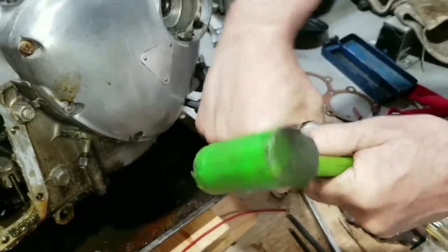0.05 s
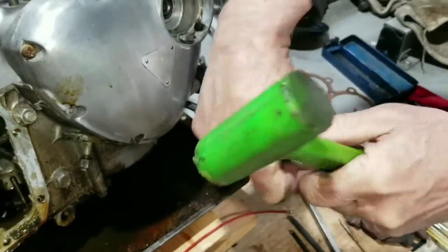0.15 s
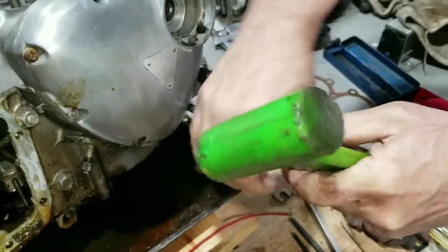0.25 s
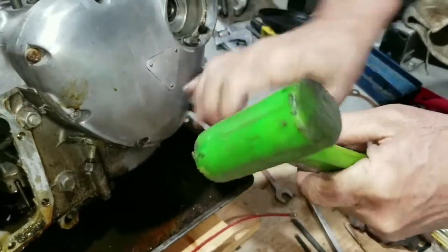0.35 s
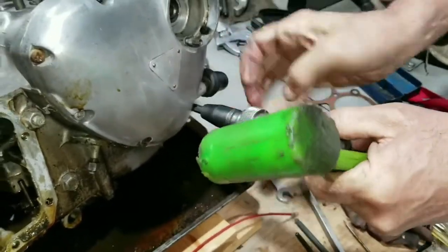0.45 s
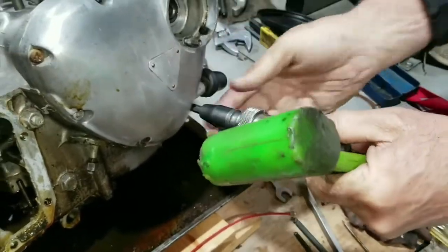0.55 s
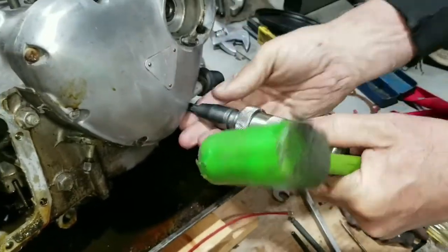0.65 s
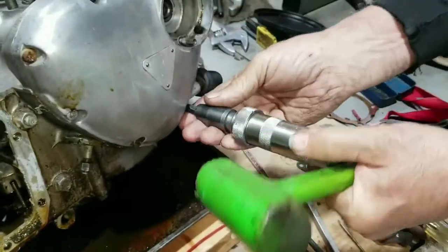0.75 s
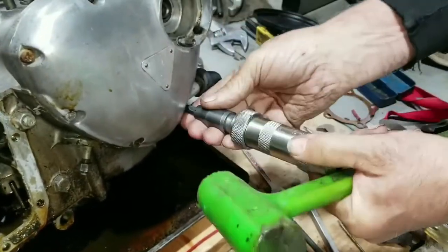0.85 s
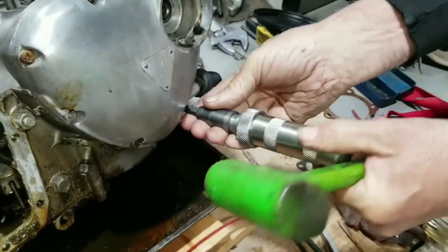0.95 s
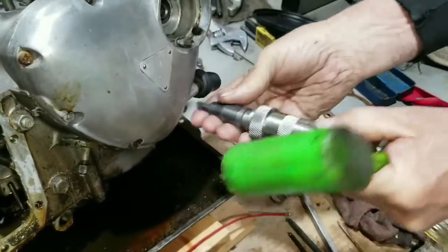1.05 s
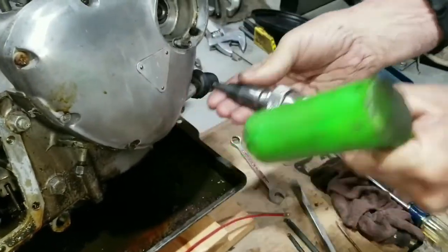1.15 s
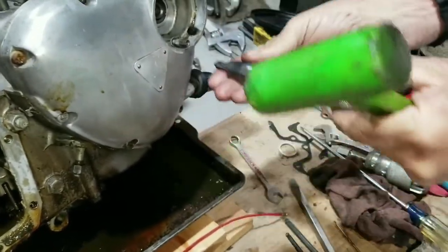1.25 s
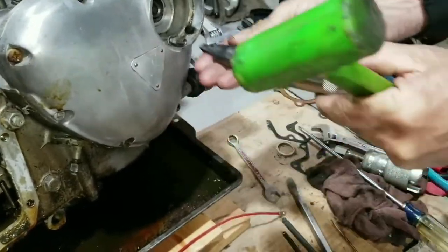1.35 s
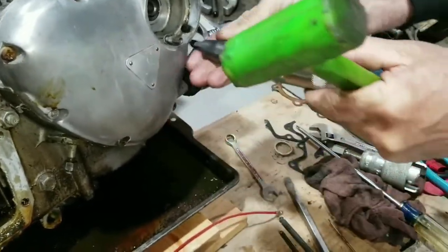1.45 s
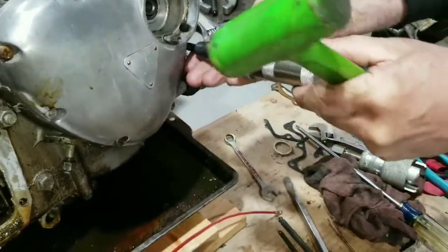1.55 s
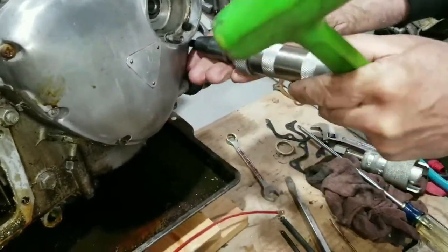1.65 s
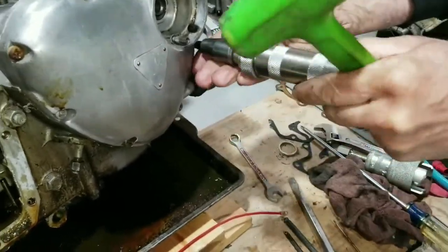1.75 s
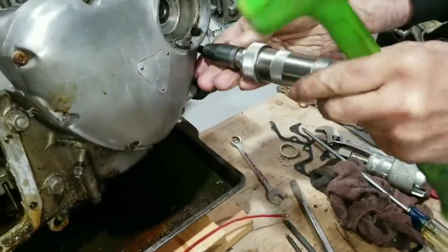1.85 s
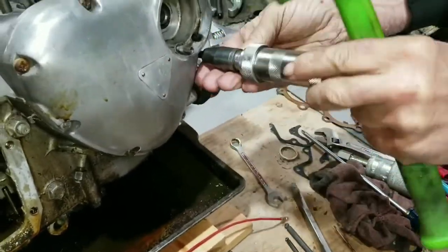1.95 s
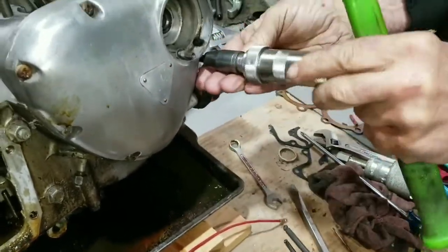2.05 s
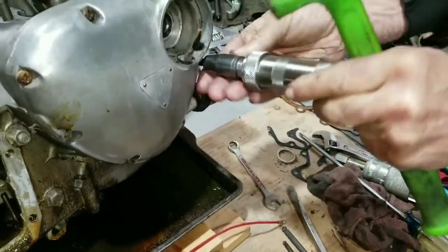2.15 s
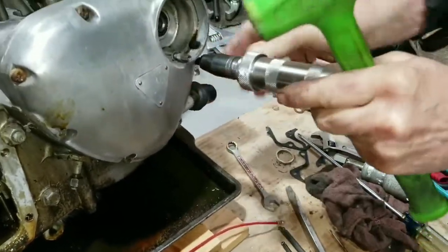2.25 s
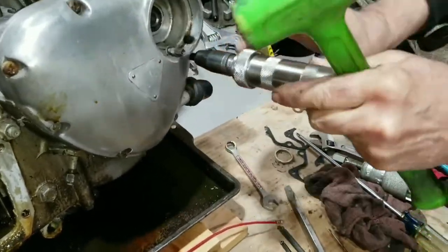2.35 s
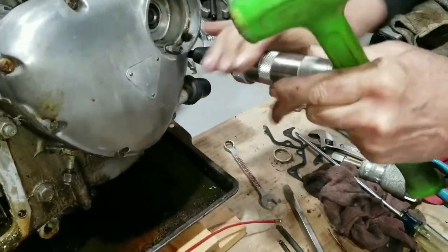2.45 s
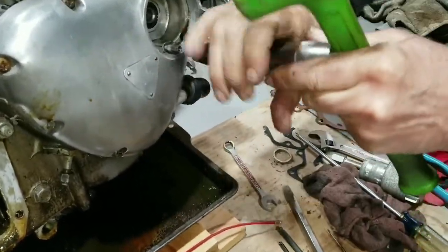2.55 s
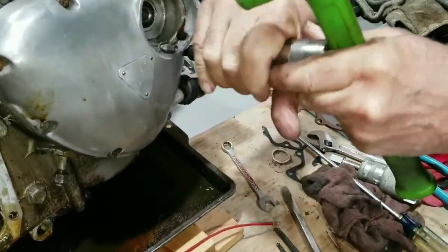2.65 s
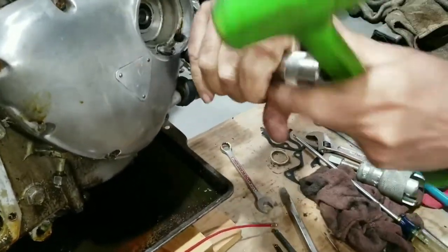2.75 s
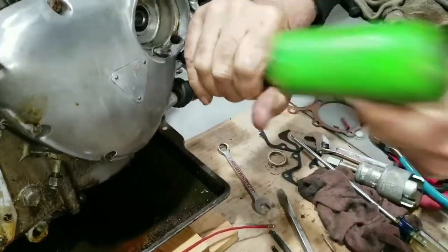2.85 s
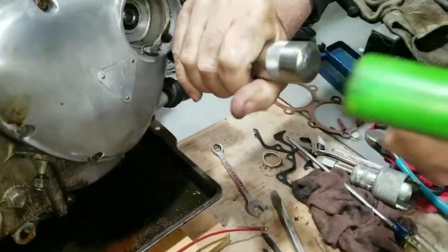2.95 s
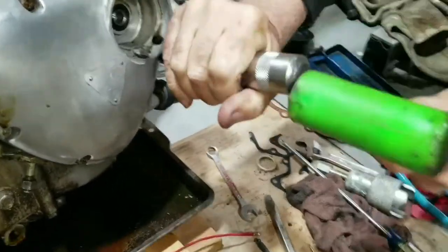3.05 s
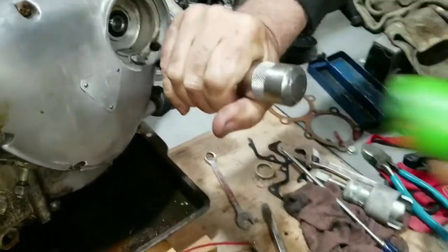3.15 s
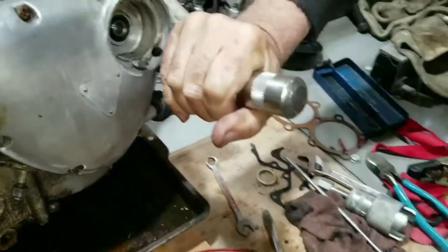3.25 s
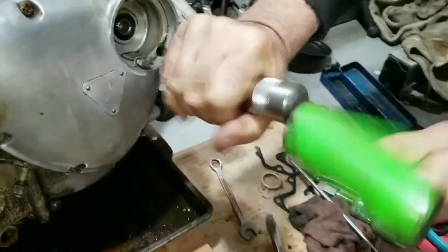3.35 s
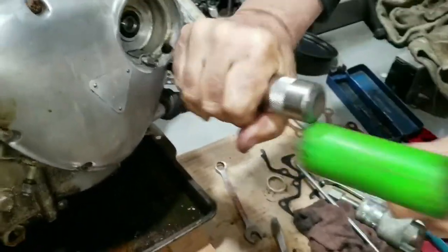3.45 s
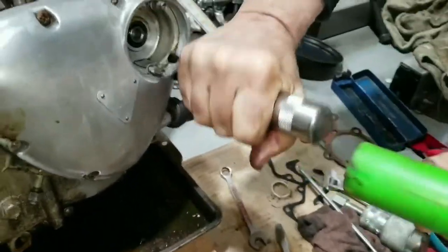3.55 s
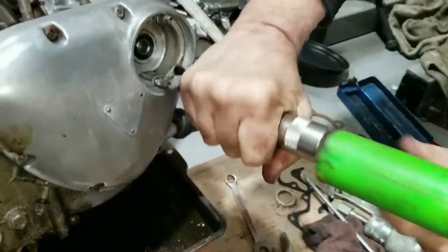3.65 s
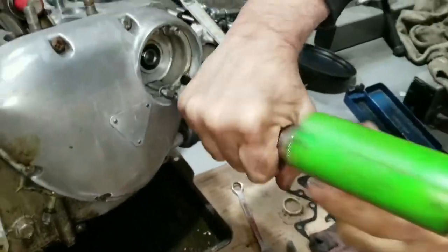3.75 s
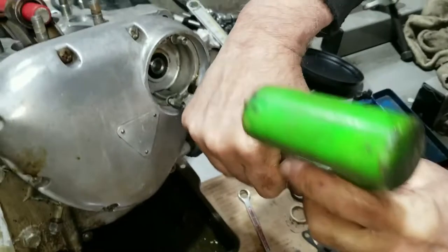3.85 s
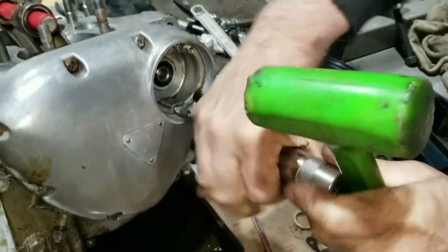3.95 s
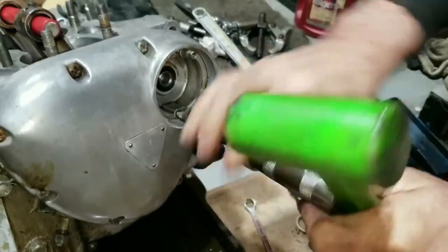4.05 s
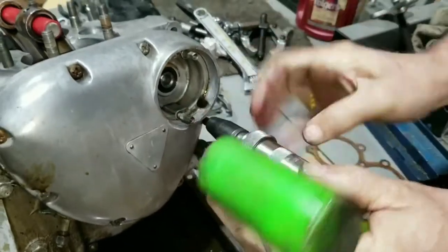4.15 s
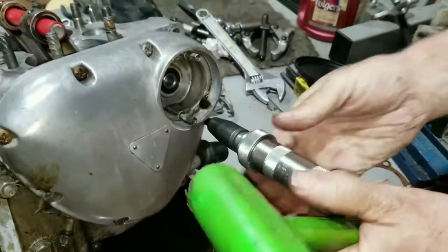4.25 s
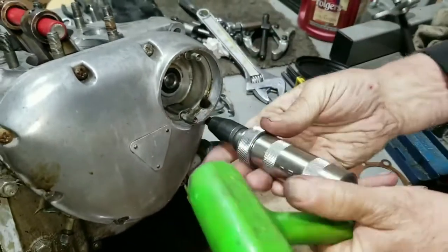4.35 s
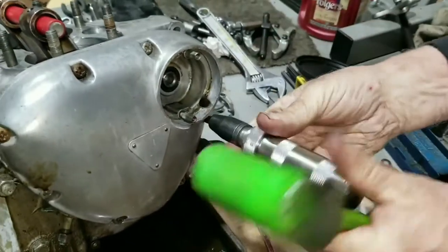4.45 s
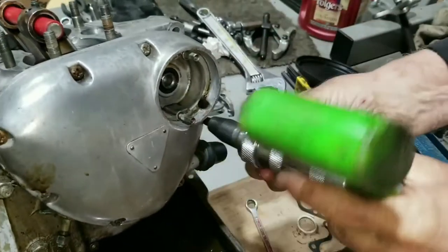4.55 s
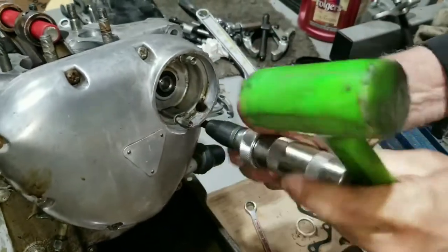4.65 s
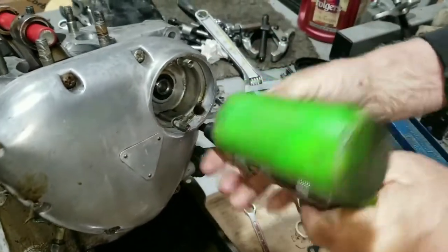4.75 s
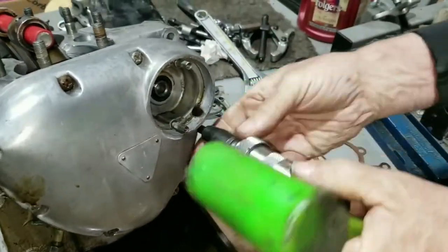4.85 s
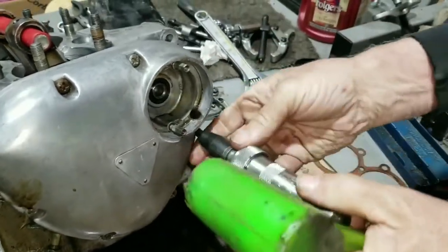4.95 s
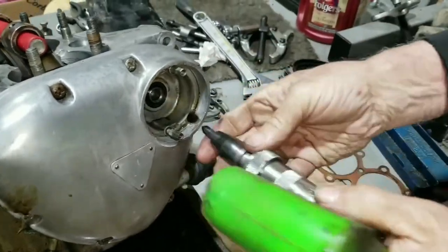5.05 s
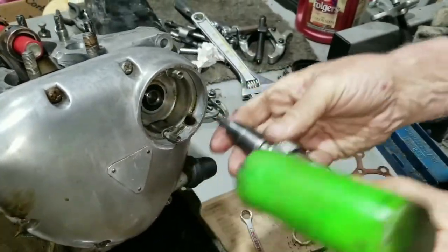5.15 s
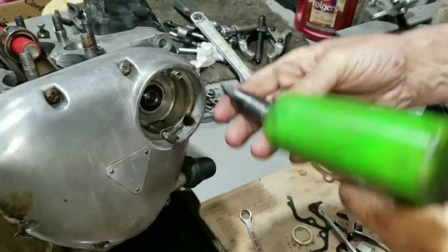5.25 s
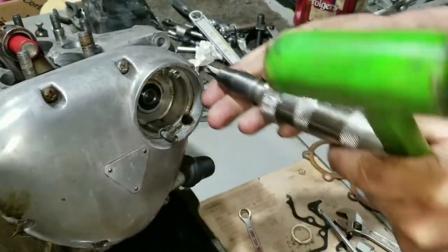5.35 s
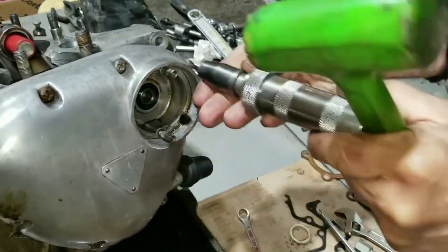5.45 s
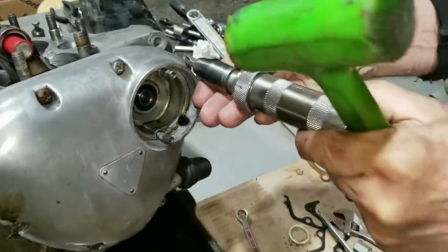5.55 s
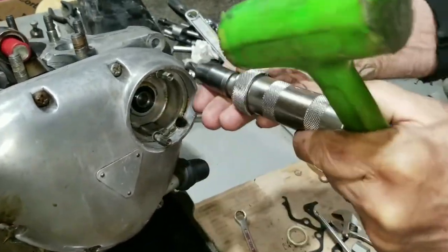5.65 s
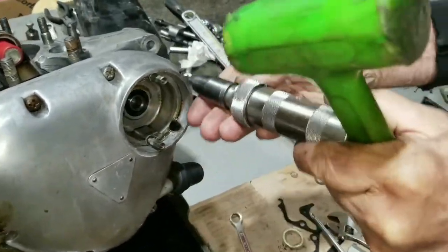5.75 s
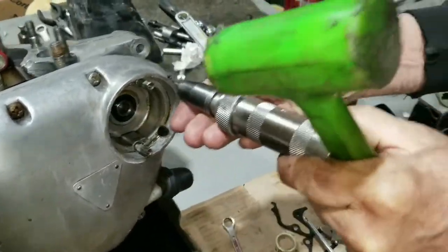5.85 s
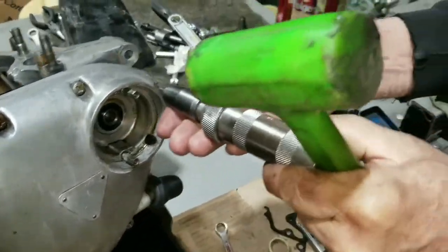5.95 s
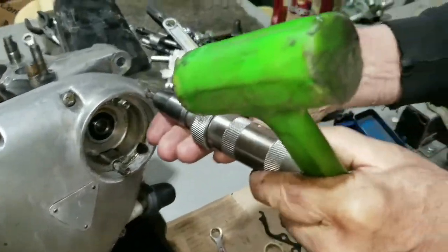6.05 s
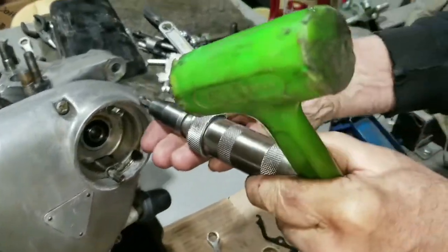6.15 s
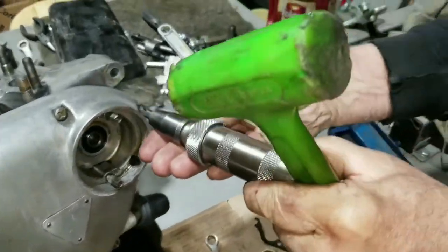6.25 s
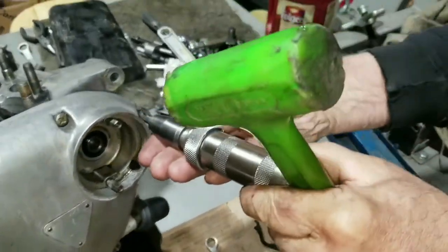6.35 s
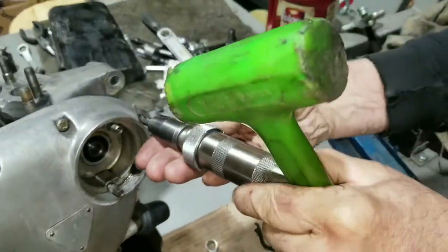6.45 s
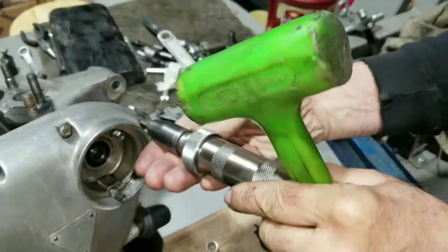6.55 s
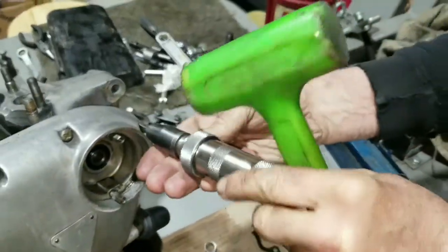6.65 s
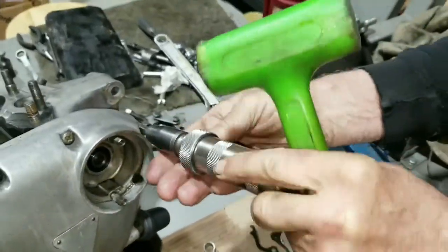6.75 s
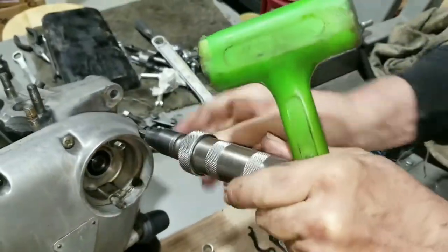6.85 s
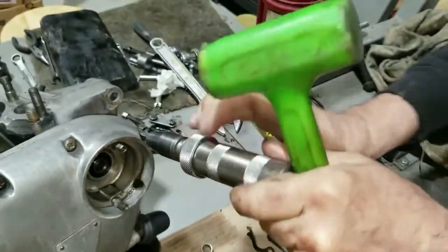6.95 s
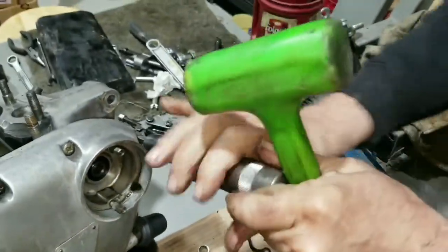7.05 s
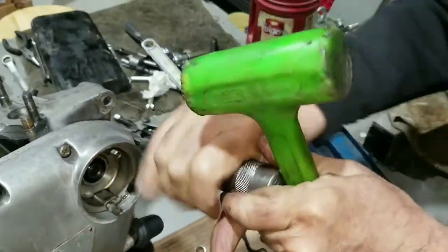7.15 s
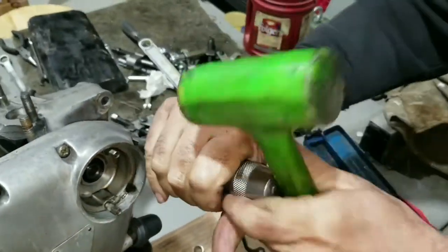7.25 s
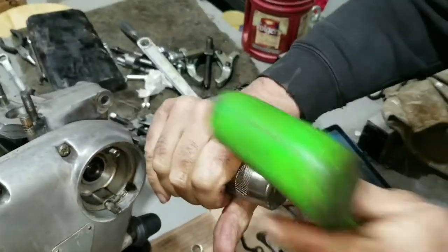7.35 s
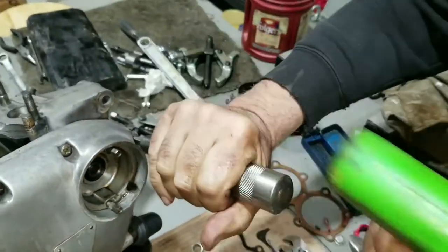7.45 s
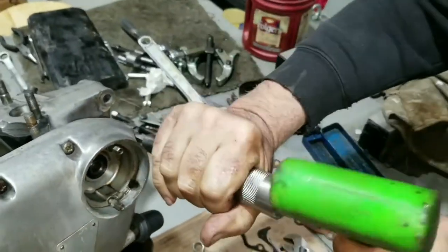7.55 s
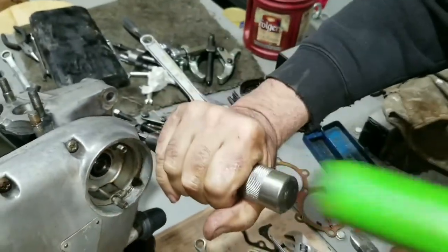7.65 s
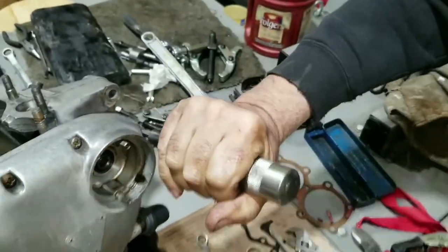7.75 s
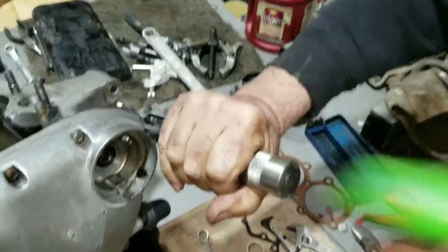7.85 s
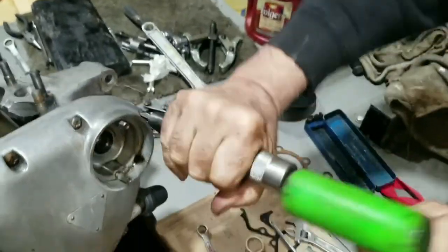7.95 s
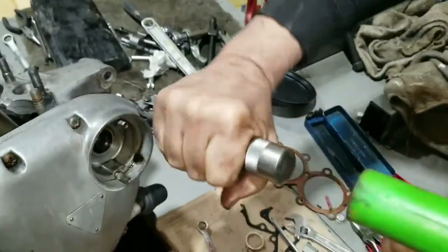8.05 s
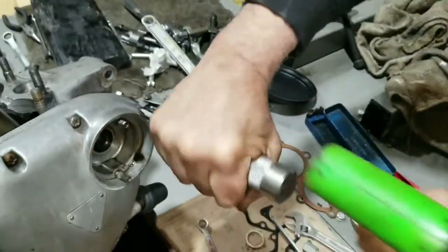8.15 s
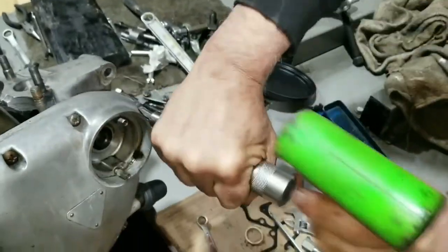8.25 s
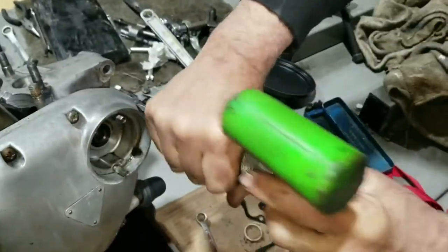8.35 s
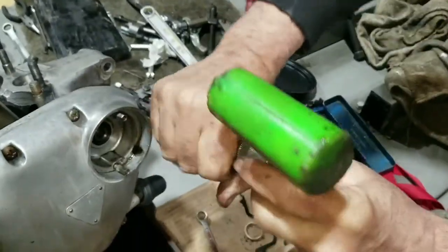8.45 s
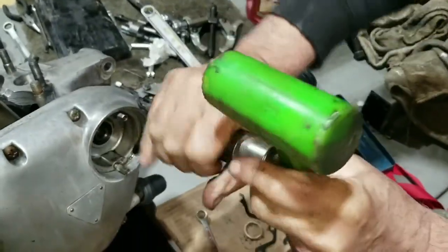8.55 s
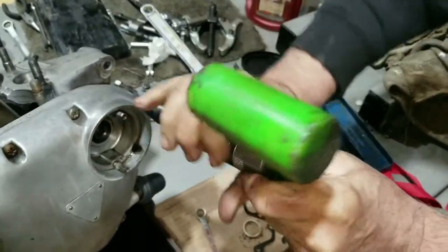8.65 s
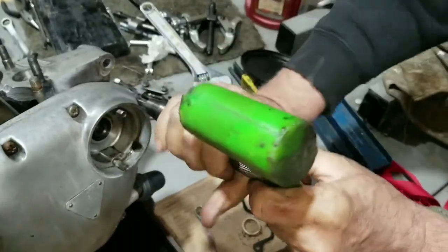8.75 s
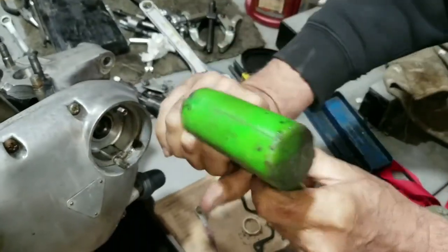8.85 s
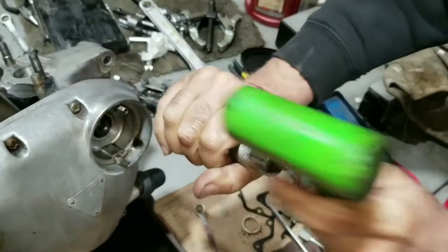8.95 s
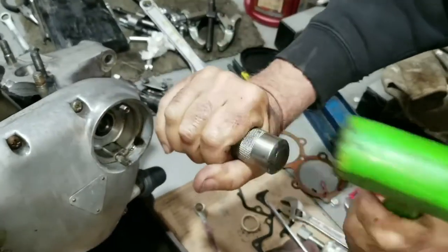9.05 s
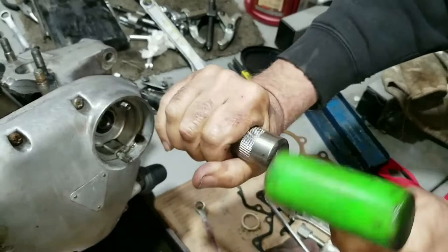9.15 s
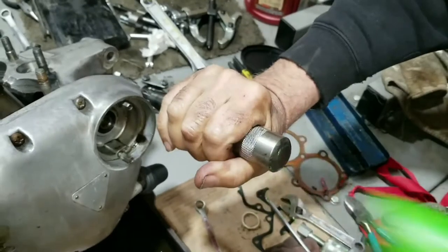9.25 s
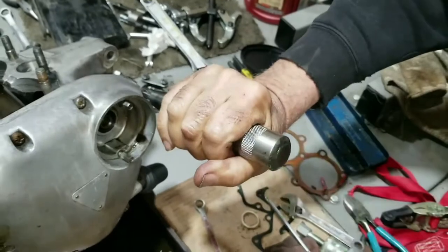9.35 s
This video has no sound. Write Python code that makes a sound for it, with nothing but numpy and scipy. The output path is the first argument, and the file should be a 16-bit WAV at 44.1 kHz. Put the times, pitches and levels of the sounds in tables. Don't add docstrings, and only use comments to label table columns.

```python
import sys
import numpy as np
from scipy import signal
from scipy.fft import rfft, irfft
from scipy.io import wavfile
from scipy.ndimage import uniform_filter1d, minimum_filter1d

SR = 44100
rng = np.random.default_rng(int(sys.argv[2]) if len(sys.argv) > 2 else 0)


def voltage_ratio(level):
    return 10 ** (np.asarray(level, float) / 20)


def store_pcm(level_fs):
    pcm = np.round(np.clip(level_fs, -1, 1) * 32767).astype(np.int16)
    wavfile.write(sys.argv[1], SR, np.atleast_2d(pcm).T)


N = 414981

# t/s, crack level/dB, shot rattle level/dB, ring level/dB, thump level/dB
HARD_BLOWS = [
    (3.3486, -8, -17.5, -23.5, -32),
    (7.8776, -5, -15, -15.5, -36),
]
LIGHT_TAPS = [
    (2.9953, -13.5, -31.5, -37, -42),
    (7.5379, -9, -23, -32, -33),
    (9.1239, -16.5, -28.5, -35.5, -44.5),
]
# f/Hz, level/dB per Hz
RATTLE_SPECTRA = [
    [(180, -50), (300, -5.5), (461, -20), (610, -3), (794, -13), (907, 1), (1020, -7), (12900, -30.5),
     (15500, -44)],
    [(180, -41.5), (400, -22), (1070, -6), (1440, -4.5), (1970, -14), (2790, -11), (11500, -17),
     (14000, -19.5), (15500, -50)],
    [(180, -20.5), (300, -2.5), (756, -15.5), (1300, -3), (2100, -21), (4000, -21), (7370, -21.5),
     (14000, -16), (15500, -31)],
    [(180, -56.5), (300, -20), (517, -11.5), (769, -19), (1420, -9.5), (1750, -21.5), (3230, -15.5),
     (14000, -31.5), (15500, -54)],
    [(180, -17.5), (300, -7), (517, -5.5), (968, -5.5), (1540, -1), (1940, -9.5), (3230, -10), (14000, -12),
     (15500, -32.5)],
]
# f/Hz, level/dB, t60/s
BLOW_MODES = [
    [(87, 0, .2), (635, -1, 0.25), (703, -6.5, 0.28), (880, -8, 0.24)],
    [(223, 0.5, 0.15), (340, -16, .2), (512.4, -14, .2), (1130, -5, .18), (1283, -5.5, .2), (1424, -1, .18),
     (2137, -13, .3), (2710, -13, .4), (3140, -5.5, 0.34), (3330, -6.5, .2), (3750, -10.5, 0.33),
     (4140, -9, 0.27), (4380, -5, .2), (4759, -8, .2)],
    [(78, -5, 0.33), (134, -3, 0.4), (219, -1.5, 0.24), (556, -4.5, .2), (1112, -6, 0.2), (1550, -2, 0.17),
     (1290, -2, .2), (1650, -3, .2)],
    [(222, -2, 0.37), (520, -3, 0.63), (610, -14.5, 0.15), (1160, -5, 0.28), (1260, -6, 0.14),
     (1408, -5, 0.22), (1662, -10, 0.48), (1949, -13, 0.15), (2760, -10, 0.56), (3100, -13, .25),
     (3332, -11, 0.3), (3500, -11.5, 0.25), (3910, -13.5, 0.25), (887, -12, 0.32)],
    [(138, -22, 0.6), (547, -1.5, 0.15), (884, 6, 0.12), (1450, -16, 0.25), (1526, -5, 0.23)],
]
# f/Hz, level/dB, t60/s
CASE_MODES = [(146.7, -7, 0.45), (230, -2, 0.19), (297, -13, 0.19), (338, -4.5, 0.024), (527, -2.5, 0.6),
              (650, -0.5, 0.15), (880, -3.5, 0.3), (1140, -7, 0.051), (1170, -4, 0.24), (1223, 3, 0.16),
              (1512, 4, 0.084), (1770, -2, 0.11)]
# t/s, peak level/dB, centre f/Hz, bright edge level/dB
CAM_REBOUNDS = [(3.0008, -15, 3885, -4.5), (3.3968, -14, 4300, -17), (7.5506, -23.5, 4120, -22),
                (7.901, -12.5, 1370, -17), (7.9249, -2.5, 3060, -4.5), (8.1615, -33, 4000, -19.5),
                (9.1265, -23.5, 5400, -15.5), (9.1385, -31, 3320, -15), (3.3515, -13.5, 5880, -11.5),
                (3.3625, -14.5, 1376, -8.5), (3.3705, -12.5, 2900, -7), (3.417, -23, 3213, -17),
                (7.8955, -17, 5690, -14), (7.9355, -13, 3140, -16.5), (7.543, -19.5, 1550, -20)]
# t/s, peak level/dB, f/Hz, rise/s, t60/s
MODE_BUMPS = [(7.551, -23.5, 236, 0.0035, 0.094), (7.569, -25.5, 162, 0.0031, .12),
              (7.621, -32, 137.5, 0.018, 0.28), (9.135, -40, 191, 0.0074, 0.17),
              (9.2, -38.5, 149.3, 0.016, 0.28), (2.998, -31.5, 197, 0.0034, 0.1),
              (7.884, -13, 528, .01, .14), (9.124, -32, 310, .003, .1), (3.36, -22, 270, .008, .15),
              (1.542, -43, 525, .008, .1), (1.75, -44, 520, .006, .1), (3.008, -36, 620, .006, .1)]
# peak t/s, rise/s, fall/s, peak level/dB, fizz level/dB re
SLIDES_AND_RUSTLES = [(2.705, 0.038, 0.059, -49, -23), (2.75, 0.034, .05, -56, -14), (2.9, 0.11, 0.11, -32.5, -6),
                      (3.31, 0.13, 0.056, -58, -3), (5.88, 0.041, .17, -52.5, -15), (7.299, 0.07, 0.24, -68.5, 1),
                      (7.832, 0.094, 0.036, -60.5, 2), (8.24, 0.052, 0.28, -65.5, -6), (8.6, .03, 0.13, -71, -7.5),
                      (9.405, 0.11, .04, -58, -11), (9.109, 0.096, .015, -76, -4), (1.92, 0.044, 0.051, -68, 4.5)]
# f/Hz, level/dB per Hz
SLIDE_SPECTRUM = [(180, -35), (330, -4), (624, -20), (800, -9), (1360, -4), (2300, -6), (4300, 0),
                  (8000, -6.5), (11500, -36.5), (18700, -120)]
# f/Hz, level/dB per Hz
FIZZ_SPECTRUM = [(6000, -31), (8500, -9), (11000, 2.5), (14000, -4), (16000, -12.5)]
# t/s, peak level/dB, centre f/Hz, bright edge level/dB
SCREW_TICKS = [(0.2884, -55, 4350, -11), (0.3805, -58, 4540, -18), (0.9624, -21, 4710, 0),
               (0.9659, -33.5, 2970, -12.5), (1.4118, -30, 3890, -3.5), (1.5405, -40, 3880, 1),
               (1.6003, -48.5, 4840, -11), (1.6296, -38.5, 5210, -5), (1.654, -36, 4670, 6.5),
               (1.7466, -46, 5700, -16), (1.7683, -41, 6400, -9.5), (2.0716, -34.5, 4540, -3),
               (2.3491, -33, 4044, -3.5), (2.4459, -37, 3000, -4), (4.0122, -54, 3860, -23),
               (4.512, -63, 6000, -3), (4.654, -48, 4010, -9), (4.9253, -40, 3040, 0.5),
                      (5.0119, -45, 4960, -10), (5.0275, -27, 5200, 0), (5.438, -35.5, 5245, -16),
                      (5.451, -34.5, 3680, -4), (5.5645, -44, 5855, -18), (5.6216, -43.5, 5150, -10),
                      (5.6538, -45, 2910, -6), (5.7616, -34.5, 5663, -24), (5.776, -32, 6060, -11),
                      (5.832, -32, 5690, -15), (5.978, -34, 5070, -16), (6.032, -38, 5420, -29),
                      (6.1777, -41.5, 4830, -26.5), (6.194, -36.5, 2110, -6), (6.4479, -43, 5770, -16),
                      (6.479, -26, 5195, -12), (6.6264, -52, 6560, -20), (6.8227, -22, 5676, -3),
                      (8.5914, -62, 2000, -3), (8.6273, -50.5, 4140, -14)]
# t/s, peak level/dB, upper mode share level/dB, contact/s
CASE_KNOCKS = [(0.281, -47.5, -57, 0.016), (1.538, -38.5, -9.5, 0.02), (1.629, -47, -19, 0.0072),
               (1.748, -37, -14, 0.014), (1.864, -46.5, -38, 0.013), (1.899, -49, -16, 0.012),
               (1.933, -45.5, -16, 0.014), (2.064, -52.5, -19, 0.016), (2.309, -49.5, -7, 0.051),
               (2.342, -39, -0.5, 0.023), (2.866, -40, -31, 0.0031), (4.013, -58, -3.5, 0.0099),
               (4.099, -69, -10, 0.015), (4.654, -54, -12, 0.011), (5.449, -56, 6, 0.037),
               (5.831, -31.5, 2, 0.0051), (6.177, -49.5, 4.5, 0.017), (6.484, -38, 8, 0.012),
               (6.596, -48.5, -4, 0.021), (6.628, -45, -1.5, 0.0079), (6.821, -39, 5.5, 0.012),
               (6.975, -59, -29, 0.019), (8.17, -44, -1.5, 0.0076), (8.626, -53.5, -2, 0.012)]
# t/s, level/dB
GRIP_RUB = [
    (5.55, -65.5),
    (5.8, -69.5),
    (6.1, -69.5),
    (6.25, -66),
    (6.4, -68.5),
    (6.66, -63),
    (6.85, -65),
    (6.96, -63.5),
    (7.2, -85.5),
]
# f/Hz, level/dB per Hz
GRIP_SPECTRUM = [(1470, -60), (3700, -40), (4400, 0.5), (5660, -4), (6410, 0.5), (7800, -1.5),
                 (9260, -11.5), (14500, -10)]
# f/Hz, t60/s
GARAGE_DECAY = [(100, 0.7), (500, 0.65), (1500, 0.68), (4000, 0.46), (8000, 0.41), (14000, 0.16)]
# f/Hz, level/dB
BODY_SHADOW = [(60, 1.0), (130, 1.0), (290, 0.5), (640, 2.0), (1410, -2.5), (3100, 0.5), (6820, 3.5),
               (15000, 1.5)]
# t/s, level/dB
RUMBLE_LEVEL = [(0.0, -57), (0.5, -62), (1.1, -58), (1.5, -57), (2.15, -60.5), (2.85, -56), (3.45, -57),
                (3.719, -74), (4.469, -65.5), (4.799, -55), (5.201, -63), (5.9, -52.5), (6.452, -58.5),
                (6.85, -53.5), (7.299, -62.5), (8.05, -56.5), (8.4, -73.5), (9.1, -78.5)]
# t/s, level/dB, half length/s
BENCH_SHUDDERS = [
    (3.055, -48, 0.037),
    (3.413, -52.5, 0.046),
    (7.76, -59.5, 0.061),
    (8.019, -45.5, 0.027),
    (9.307, -55, 0.087),
]
# f/Hz, level/dB per Hz
RUMBLE_SPECTRUM = [(12, -48.5), (20, -14), (43, -21.5), (107, -3), (133, -2), (341, -11.5), (380, -16.5),
                   (608, -29.5), (715, -34), (857, -30.5), (1030, -36.5), (1500, -34), (1950, -68),
                   (3300, -120)]
# f/Hz, level/dB per Hz
HISS_SPECTRUM = [(350, -21.5), (600, 4.5), (687, -8.5), (777, -3.5), (1580, -3.5), (2070, -3.5), (3110, -6),
                 (4810, -6.5), (13900, -11), (15500, -19)]
# f/Hz, likeness/1
LIKENESS = [(60, 0.87), (180, 0.92), (550, 0.41), (1650, 0.14), (4970, 0.21), (15000, 0.19)]

HARD_DB, HARD_RATTLE_S, LIGHT_RATTLE_S = -20, .049, .016
SETTLE_HZ, SETTLE_DB, SETTLE_S = 5000, -23, 0.09
BENCH_RING, HELD_RING = .7, 0.55
PARTNER_DB = -7
TICK_T60_S, REBOUND_T60_S, SCATTER_DB = 0.033, 0.044, 2.5
SNAP_DB, SNAP_S = 3, .0006
STEEL_T60_S, STEEL_DB = .022, -5
SWELL_DB = 20.5
EDGE_HZ = 14700


def evened(x):
    return x / np.sqrt(np.mean(x ** 2) + 1e-20)


def read(points, hz):
    f, value = np.transpose(points)
    return np.interp(np.log(hz + 1), np.log(f + 1), value)


def add(mix, s, sound, pan_db=0.):
    part = mix[:, round(s * SR):][:, :sound.shape[-1]]
    gain = voltage_ratio(np.array([[pan_db / 2], [-pan_db / 2]]))
    part += (sound * gain)[:, :part.shape[1]]


def pair(size, same):
    a, b = rng.standard_normal((2, size))
    same = np.clip(same, -1, 1)
    shared = np.roll(a, rng.integers(-16, 17))
    return np.array([a, same * shared + np.sqrt(1 - same ** 2) * b])


def coloured(x, spectrum):
    hz = np.fft.rfftfreq(x.shape[-1], 1 / SR)
    return evened(irfft(rfft(x) * voltage_ratio(read(spectrum, hz)), x.shape[-1]))


def gritty(size, same, spread_db):
    grains = np.repeat(rng.exponential(1, size // 16 + 1), 16)[:size]
    return pair(size, same) * voltage_ratio(spread_db * np.minimum(grains, 4))


def ring(modes, drive, top_db=0., damping=0.99, uneven_db=0., split=.02):
    t = np.arange(round(SR * .55 * min(damping, 1))) / SR
    out = np.zeros((2, len(t)))
    partners = [(hz, db + PARTNER_DB, t60) for hz, db, t60 in modes]
    for hz, db, t60 in modes + partners:
        reach, shift, *phase = rng.uniform(-1, 1, 4)
        start = np.outer(phase, np.minimum(t * hz, 1)) * min(hz / 400, 3)
        level_db = db + uneven_db * reach + top_db * np.log2(max(hz, 400) / 500)
        decay_db = -60 * t / (damping * min(t60, .55))
        turns = hz * (1 + split * shift) * t
        out += voltage_ratio(level_db + decay_db) * np.sin(2 * np.pi * turns + start)
    out = signal.fftconvolve(out, drive[None], axes=1)
    return out / abs(out).max()


def blow(crack_db, rattle_db, seconds, ring_db, thump_db, colour, modes):
    t = np.arange(SR // 2) / SR
    late = np.maximum(t - .004, 0)
    crack = voltage_ratio(crack_db + 3) * np.sin(2 * np.pi * 4200 * late) * np.exp(-late / .00022)
    lead_in = np.minimum(t / .0045, 1) ** 3 * (1 - .65 * np.exp(-late / .009))
    flying = np.exp(-(late / seconds) ** (50 * seconds))
    settling = voltage_ratio(SETTLE_DB) * np.exp(-late / SETTLE_S)
    landing = lead_in * (flying + settling)
    shot = coloured(gritty(len(t), .45, 1.6), colour)
    dull = signal.lfilter(*signal.butter(1, SETTLE_HZ, fs=SR), shot)
    rattle = voltage_ratio(rattle_db + 2) * lead_in * (shot * flying + dull * settling)
    drive = rfft((rng.standard_normal(len(t)) * landing)[:SR // 8])
    drive = irfft(drive / abs(drive))
    high = [mode for mode in modes if mode[0] > 300]
    low = [mode for mode in modes if mode[0] <= 300]
    case = ring(high, drive, damping=19 * seconds - .2, split=.007)
    bench = ring(low + CASE_MODES[:3], drive, damping=BENCH_RING, split=0.071)
    out = crack + rattle
    add(out, 0, voltage_ratio(ring_db + 5.5) * case)
    add(out, 0, voltage_ratio(thump_db + 7.0) * bench)
    return out


def tick(db, hz, t60, fizz_db):
    t = np.arange(2048) / SR
    lead_in = np.minimum(t / .0038, 1) ** 2
    lead_in *= 1 + voltage_ratio(SNAP_DB) * (t > .003) * np.exp(-abs(t - .003) / SNAP_S)
    burst = gritty(len(t), .6, 2.2) * voltage_ratio(-60 * t / max(t60, .005)) * lead_in
    b, a = signal.iirpeak(min(hz, 12000), 1.1, SR)
    body = evened(signal.lfilter(b, a, signal.lfilter(b, a, burst)))
    edge = evened(np.diff(burst, n=3, prepend=np.zeros((2, 3))))
    parts = hz * np.exp(rng.uniform(-.6, .7, (12, 1, 1))) * t + rng.random((12, 2, 1))
    steel = evened(np.sin(2 * np.pi * parts).sum(0) * voltage_ratio(-60 * t / STEEL_T60_S) * lead_in)
    burst = body + voltage_ratio(fizz_db + 7.0) * edge + voltage_ratio(STEEL_DB) * steel
    return voltage_ratio(db) * burst / abs(burst).max()


def bump(db, hz, rise, t60):
    t = np.arange(SR // 4) / SR
    swell = 1 - np.exp(-t / max(rise, .001))
    decay = voltage_ratio(db - 60 * t / max(t60, .02))
    return decay * swell * np.sin(2 * np.pi * hz * t * (1 - .3 * t))


def push(seconds):
    t = np.arange(2048) / SR
    contact = rfft(rng.standard_normal(len(t)) * t * np.exp(-t / max(seconds / 3, 1e-4)))
    return irfft(contact / np.sqrt(abs(contact)))


def knock(db, top_db, seconds, damping):
    damping = np.clip(.6 * damping, .1, .28)
    modes = ring(CASE_MODES, push(seconds), top_db, damping, uneven_db=3, split=.025)
    t = np.arange(modes.shape[1]) / SR
    colour = [(100, -14.0), (300, 0.0), (600, -3.0), (1200, top_db), (2400, 2 * top_db - 6.5), (6000, -33)]
    thud = coloured(pair(len(t), 0.16), colour) * t / seconds * np.exp(1 - t / seconds)
    return voltage_ratio(db) * (modes + voltage_ratio(-19.5) * thud)


def slide(rows):
    s, db, fizz_db = np.transpose(rows)
    t = np.arange(s[0], s[-1], 1 / SR)
    grains = gritty(len(t), 0.9, 2.0)
    fizz = voltage_ratio(np.interp(t, s, fizz_db)) * coloured(grains, FIZZ_SPECTRUM)
    pour = coloured(grains, SLIDE_SPECTRUM) + fizz
    return s[0], pour * voltage_ratio(np.interp(t, s, db) + 1.0) * signal.windows.tukey(len(t), .3)


def rub():
    s, db = np.transpose(GRIP_RUB)
    t = np.arange(s[0], s[-1], 1 / SR)
    hiss = coloured(gritty(len(t), 0.55, 1.0), GRIP_SPECTRUM)
    return s[0], hiss * voltage_ratio(np.interp(t, s, db) + 4.5) * signal.windows.tukey(len(t), .1)


def garage(x):
    taps = np.zeros((2, 32000))
    at = np.arange(200, 32000, 20) + rng.integers(0, 20, (2, 1590))
    np.put_along_axis(taps, at, rng.choice([-1., 1.], at.shape), 1)
    hz, t, z = signal.stft(taps, SR, nperseg=256)
    decay = voltage_ratio(-60 * t / read(GARAGE_DECAY, hz)[:, None])
    tail = signal.istft(z * decay, SR, nperseg=256)[1]
    return signal.fftconvolve(x, tail / np.linalg.norm(tail[0]), axes=1)[:, :N]


def background():
    frames, hz = N // 512 + 5, np.fft.rfftfreq(2048, 1 / SR)
    s, db = np.transpose(RUMBLE_LEVEL)
    t = np.arange(0, N + 64, 64) / SR
    rumble_db = np.interp(t, s, db)
    slow_db = uniform_filter1d(minimum_filter1d(rumble_db, size=SR // 256), size=SR // 512)
    hiss_db = 0.72 * (slow_db + 63.0) - 73.5
    swell = sum(voltage_ratio(2 * peak_db) * np.exp(-((t - at) / half) ** 2) for at, peak_db, half in BENCH_SHUDDERS)
    rumble_db = 10 * np.log10(voltage_ratio(2 * rumble_db) + swell)
    same = np.clip(read(LIKENESS, hz), -1, 1)[:, None]
    out = 0
    for spectrum, level_db, patchy_db in ((RUMBLE_SPECTRUM, rumble_db, 2.5), (HISS_SPECTRUM, hiss_db, 3)):
        a, b, c, d, patches = rng.standard_normal((frames, len(hz), 5), dtype=np.float32).T
        patches = evened(uniform_filter1d(uniform_filter1d(patches, size=21, axis=0), size=7, axis=1))
        left = a + 1j * b
        z = np.array([left, same * left + np.sqrt(1 - same ** 2) * (c + 1j * d)])
        z *= voltage_ratio(read(spectrum, hz)[:, None] + patchy_db * patches)
        noise = evened(signal.istft(z, nperseg=2048, noverlap=1536)[1][:, :N])
        out = out + noise * np.interp(np.arange(N) / SR, t, voltage_ratio(level_db))
    return out


def scene():
    small, big = np.zeros((2, 2, N))
    blows = sorted(HARD_BLOWS + LIGHT_TAPS)
    for (s, crack_db, rattle_db, ring_db, thump_db), colour, modes in zip(blows, RATTLE_SPECTRA, BLOW_MODES):
        seconds = HARD_RATTLE_S if rattle_db > HARD_DB else LIGHT_RATTLE_S
        add(big, s - .0025, blow(crack_db, rattle_db, seconds, ring_db, thump_db, colour, modes))
    lean_db = read(BODY_SHADOW, np.fft.rfftfreq(512, 1 / SR)) / 2 * [[1], [-1]]
    big = signal.oaconvolve(big, np.roll(irfft(voltage_ratio(lean_db)), 256, axis=1), "same", axes=1)
    ticks = SCREW_TICKS
    for rows, t60 in ((ticks, TICK_T60_S), (CAM_REBOUNDS, REBOUND_T60_S)):
        for s, db, hz, fizz_db in rows:
            add(small, s - .003, tick(db + 5.5, hz, t60, fizz_db), SCATTER_DB * rng.uniform(-1.4, 1))
    for s, *row in MODE_BUMPS:
        add(small, s, bump(*row)[None])
    for s, db, top_db, seconds in CASE_KNOCKS:
        add(small, s, knock(db + 3.0, top_db, seconds, HELD_RING), SCATTER_DB * rng.uniform(-1, 1))
    for s, rise, fall, db, fizz_db in SLIDES_AND_RUSTLES:
        edge_db = db - SWELL_DB
        add(small, *slide([(s - rise, edge_db, fizz_db), (s, db, fizz_db), (s + fall, edge_db, fizz_db)]))
    add(small, *rub())
    work = small + big + garage(voltage_ratio(-9) * small + voltage_ratio(-12.0) * big)
    return signal.sosfilt(signal.butter(3, 62, "high", fs=SR, output="sos"), work) + background()


def top_cut(x):
    return signal.sosfilt(signal.butter(12, 15740, fs=SR, output="sos"), x)


def record(dry):
    x = 1.1 * np.tanh(dry / 1.1)
    low = signal.oaconvolve(x, signal.firwin(401, EDGE_HZ, window=("kaiser", 9), fs=SR)[None], "same")
    power = (np.diff(x, prepend=0) ** 2).mean(0)
    now = uniform_filter1d(power, size=128)
    before = np.roll(uniform_filter1d(power, size=512), 400)
    attack = uniform_filter1d(1. * (now > voltage_ratio(36) * before), size=200) > 0
    gate = uniform_filter1d(1. * attack, size=128)
    mix = low + voltage_ratio(-13) * (x - low) * gate
    return top_cut(mix)


dry = scene()
out = record(dry)
store_pcm(out)
```